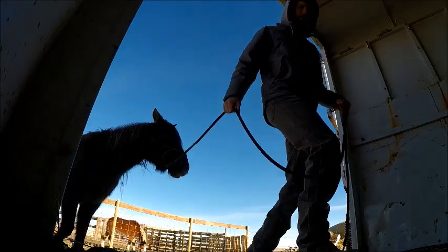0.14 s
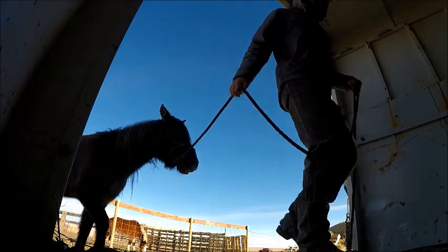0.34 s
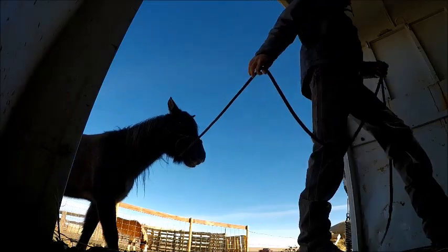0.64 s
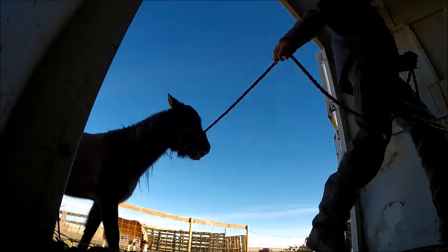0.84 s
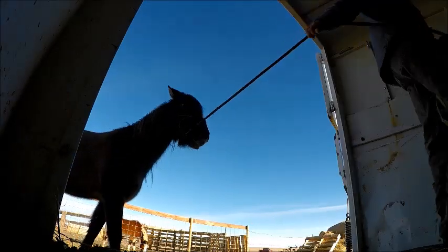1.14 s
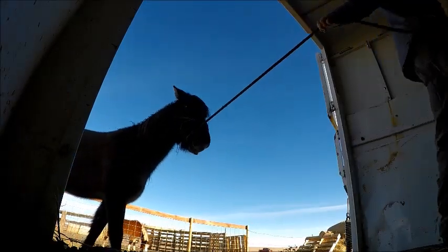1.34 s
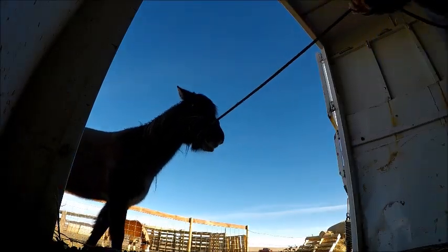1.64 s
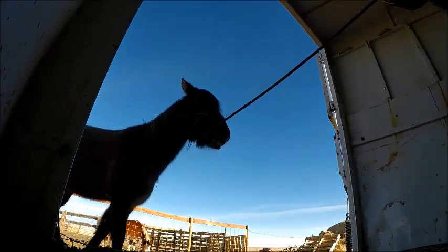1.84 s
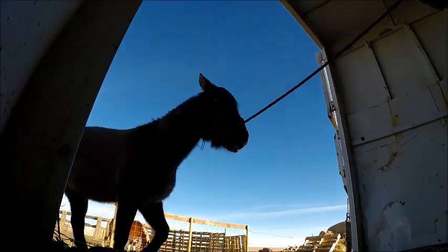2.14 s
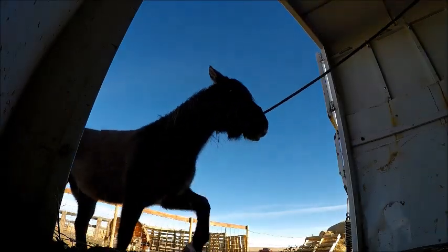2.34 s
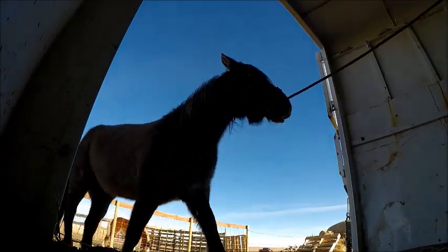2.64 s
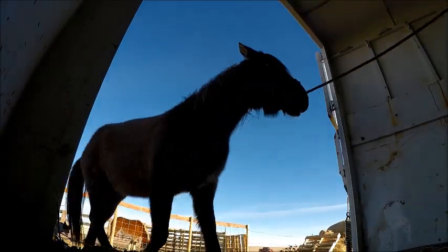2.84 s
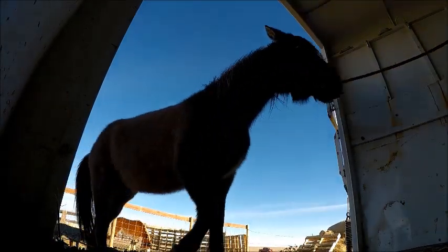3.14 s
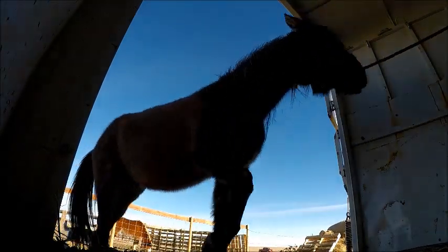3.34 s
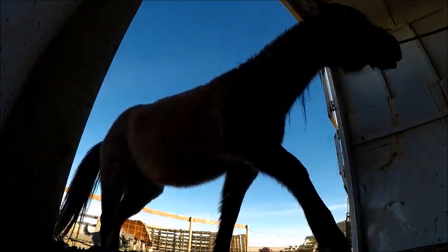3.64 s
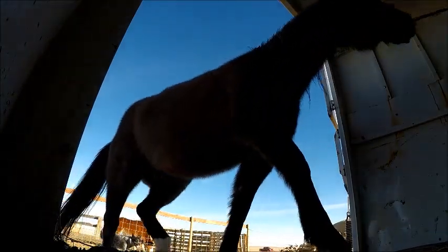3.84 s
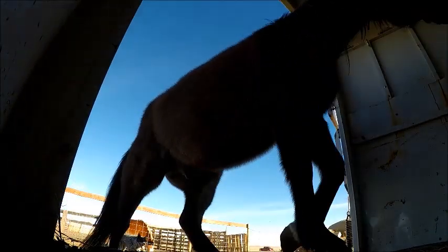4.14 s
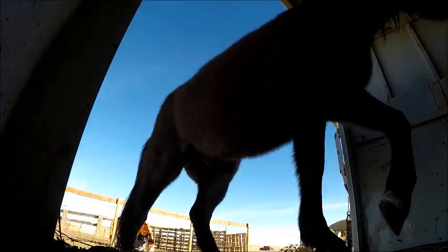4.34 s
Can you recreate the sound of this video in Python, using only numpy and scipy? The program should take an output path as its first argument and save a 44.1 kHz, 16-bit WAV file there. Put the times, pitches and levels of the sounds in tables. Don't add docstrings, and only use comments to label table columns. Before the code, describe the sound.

Heard from the floor of a steel stock trailer: a quick boot thump with knocks and a metallic tick, small rattles and softer steps. Thin hinge squeaks chirp. Then a hoof lands with a loud, deep hollow boom, the gate squeaks long and high, and two more heavy hoof blows follow, panels ringing briefly. Low rocking rumble and faint outdoor hiss remain.

```python
import sys
import numpy as np
from scipy import signal
from scipy.fft import rfft, irfft, next_fast_len
from scipy.io import wavfile
from scipy.ndimage import uniform_filter1d

SR = 44100
rng = np.random.default_rng(int(sys.argv[2]) if len(sys.argv) > 2 else 0)


def level_to_linear(level):
    exponent = np.asarray(level, float) / 20
    return 10 ** exponent


def output_pcm(signal):
    pcm = np.clip(np.atleast_2d(signal).T, -1, 1) * 32767
    wavfile.write(sys.argv[1], SR, np.round(pcm).astype(np.int16))


N = 198047


def rms_one(x):
    return x / np.sqrt(np.mean(x ** 2) + 1e-20)


def in_time(rows):
    time_s, *columns = np.transpose(rows)
    return [np.interp(np.arange(N) / SR, time_s, column) for column in columns]


def at_hz(points, hz):
    points_hz, values = np.transpose(points)
    return np.interp(np.log(hz), np.log(points_hz + 1), values)


def drift(rate_hz):
    r = np.exp(-80 * np.pi * rate_hz / SR)
    white = rng.standard_normal(N // 40 + 2002)
    slow = signal.lfilter([1], [1, -2 * r, r * r], white)[2000:]
    return np.interp(np.arange(N) / 40, np.arange(len(slow)), rms_one(slow))


def ring(x, hz, t60_s):
    r, w = level_to_linear(-60 / (t60_s * SR)), 2 * np.pi * hz / SR
    return signal.lfilter([0, np.sin(w)], [1, -2 * r * np.cos(w), r * r], x + 1e-18)


def swell(clicks, rise_s, t60_s):
    up, down = np.exp(-1 / (rise_s * SR)), level_to_linear(-60 / (t60_s * SR))
    dying = signal.lfilter([1], [1, -down], clicks + 1e-18)
    return signal.lfilter([1 - up], [1, -up], dying)


def band(x, low_hz, high_hz):
    sos = signal.butter(2, [low_hz, high_hz], "band", fs=SR, output="sos")
    return rms_one(signal.sosfilt(sos, x))


def low_pass(x, cut_hz):
    return signal.sosfilt(signal.butter(4, cut_hz, fs=SR, output="sos"), x)


def strikes(rows, colour_db, colour_hz, hz):
    clicks = np.zeros(N)
    grip_db = [np.interp(np.log(hz), np.log(colour_hz), c) for c in colour_db]
    scatter_db = rng.standard_normal(len(rows))
    clicks[(rows[:, 0] * SR).astype(int)] = level_to_linear(rows[:, 1] + grip_db + scatter_db)
    return clicks


def struck(felt, modes, build_cycles):
    out = 0
    for k, (hz, mode_db, t60_s) in enumerate(modes):
        wave = ring(felt(hz), hz, t60_s) * rng.choice([-1, 1])
        r, turn = np.exp(-hz / (build_cycles * SR)), np.exp(2j * np.pi * hz / SR)
        built = signal.lfilter([2 - 2 * r], [1, -r * turn], wave).real
        out = out + level_to_linear(mode_db) * built * np.array([[1], [0.3 * (-1) ** k]])
    return out


# (frequency [Hz], t60 [s])
DENSE_T60 = [(40, 0.41), (110, 0.85), (280, 0.5), (740, 0.38), (1940, 0.51), (5120, 1)]


def crowded(felt, edges_hz, build_cycles, top_slope_db, front_db):
    out, white = 0, rng.standard_normal((2, 2, N)) * [[1], [.5]]
    for k, (low, high) in enumerate(zip(edges_hz, edges_hz[1:])):
        hz = np.sqrt(low * high)
        clicks = felt(hz) * level_to_linear(top_slope_db * max(np.log2(hz / 2100), 0))
        body = swell(clicks, build_cycles / hz, at_hz(DENSE_T60, hz))
        front = level_to_linear(front_db) * swell(clicks, 0.0014, 0.01)
        out = out + (body + front) * band(white[k % 2], low, high)
    return out


# (time [s], peak [dB], spring boom, frame thud, plank thud [dB re peak])
THUMPS = [(0.06, -26, -4.5, -2, -11), (0.117, -25, -20, -35, -8), (0.555, -28.5, -59, -13.5, -3),
          (0.838, -21, -5, -14.5, -12), (0.969, -30.5, -33, -4, -10), (1.564, -24.5, -0.5, -8, -10),
          (1.582, -25.5, -28, -5, -10.5), (1.749, -30.5, -34, -8.5, -12.5), (2.25, -28.5, -27, -13, -12),
          (2.58, -46, -15, -7, 3), (2.632, -30, -25, -6, -2), (2.646, -5.5, -9, -10.5, -8),
          (2.689, -9, -12, -12, -23), (3.119, -20, -6.5, -9, -16.5), (3.752, -3.5, -7, -10, -26.5),
          (3.779, -15, -10, -40, -8), (3.999, -18, -5.5, -21.5, -29), (4.152, -9, -27, -0.5, -10.5),
          (4.197, -22.5, 7.5, -22, -33), (4.368, -23.5, 4.5, -13, -48)]
# boom, frame and plank centres [Hz]
THUMP_HZ = [50, 115, 210]
# (frequency [Hz], level [dB], t60 [s])
FRAME = [(48.44, 5, 0.66), (103.8, -2.5, 0.5), (130.6, 4, 0.23), (150.8, 0, 0.25), (177.9, -2, 0.66),
         (208.6, -4, 0.35), (253.5, -5.5, 0.52), (273, -9.5, 0.14)]


def thumps(boom_db=-4, clear_db=-4, dense_db=-14):
    rows = np.array(THUMPS)
    felt = lambda hz: strikes(rows, rows[:, 2:], THUMP_HZ, hz)
    edges_hz = 80 * 2 ** np.arange(0, 2.1, 1 / 2)
    planks = crowded(felt, edges_hz, build_cycles=0.09, top_slope_db=0, front_db=-48)
    boom = struck(felt, FRAME[:1], build_cycles=0.44)
    frame = struck(felt, FRAME[1:], build_cycles=0.3)
    return level_to_linear(boom_db) * boom + level_to_linear(clear_db) * frame + level_to_linear(dense_db) * planks


# (time [s], peak [dB], knock, clack, crack [dB re peak])
KNOCKS = [(0.055, -26.5, -7, -12, -28), (0.093, -34, -18, -18, -12), (0.103, -24.5, -12, -1, -43),
          (0.11, -31, 4, -6, -3.5), (0.846, -51, -8, 5, -6), (0.968, -46.5, 1, -9, -3),
          (1.562, -39.5, -2, -10, -46), (1.614, -37.5, -4, -41, -17), (2.579, -48, -9, 4, -8),
          (2.644, -14.5, -2, 0, -30), (2.656, -37, 17.5, -30, 2), (3.113, -40, -10, -4, -30),
          (3.68, -38.5, -7, -29, -29), (3.753, -14.5, -14, -5.5, -53), (4.15, -27.5, 1.5, -11, -12),
          (4.157, -25.5, -6.5, 2, -42), (4.175, -34, 5, -18, -27)]
# reference, knock, clack and crack centres [Hz]
KNOCK_HZ = [400, 650, 1100, 2100]
# (frequency [Hz], level [dB], t60 [s])
PANELS = [(313, 2.5, 0.06), (362, 1, 0.012), (460, 1.5, 0.24), (490, -5, 0.44), (537, -3, 0.15),
          (600, -6, 0.23), (717, -4, 0.075), (849, -1, 0.33), (1050, -17, 0.12), (1280, -2, 0.063),
          (1564, 0, 0.099), (1750, -13, 0.067), (1970, 2, 0.2)]
CHOKE_DB_PER_S, PLANTED_FROM_S, PLANTED_CHOKE_DB_PER_S = 36.5, 4.1, 76
MAT_CUT_HZ = 4150


def knocks(clear_db=-7, dense_db=-15):
    rows, t = np.array(KNOCKS), np.arange(N) / SR
    colour_db = np.pad(rows[:, 2:5], ((0, 0), (1, 0)))
    felt = lambda hz: strikes(rows, colour_db, KNOCK_HZ, hz)
    edges_hz = 290 * 2 ** np.arange(0, 4.1, 1 / 3)
    dense = crowded(felt, edges_hz, build_cycles=0.89, top_slope_db=-11, front_db=10.5)
    dense = low_pass(dense, MAT_CUT_HZ)
    last_s = rows[np.maximum(np.searchsorted(rows[:, 0], t) - 1, 0), 0]
    choke_db_per_s = np.where(last_s < PLANTED_FROM_S, CHOKE_DB_PER_S, PLANTED_CHOKE_DB_PER_S)
    choke = level_to_linear(-choke_db_per_s * (t - last_s))
    clear = struck(felt, PANELS, build_cycles=0.47)
    return choke * (level_to_linear(clear_db) * clear + level_to_linear(dense_db) * dense)


# (time [s], peak [dB], ring [Hz])
TICKS = [(0.0653, -43, 6100), (0.0657, -36, 7600), (0.0653, -60, 11500), (0.0917, -20, 1030),
         (0.0917, -37, 6400), (0.0922, -28, 1940), (0.1027, -25.5, 1800), (0.1094, -27.5, 2060),
         (0.0545, -29, 390), (0.069, -46, 2100), (0.0965, -37, 2120), (0.1265, -41, 2030),
         (0.137, -42, 1950), (0.5122, -42, 5700), (0.5135, -39, 3550), (0.526, -46, 5800),
         (0.5265, -46, 2150), (0.5275, -36, 3700), (0.9682, -46, 930), (1.003, -51, 4270),
         (0.954, -47, 2900), (1.608, -48, 1880), (0.98, -39, 1050), (2.0043, -63, 2330),
         (2.0043, -43, 6140), (2.0043, -43, 6940), (2.0032, -50, 9200), (2.0043, -51, 11400),
         (2.4633, -52, 1590), (2.6495, -24.5, 1690), (2.6535, -35, 1990), (2.664, -38, 2100),
         (2.689, -37, 1720), (2.696, -36, 2110), (2.6545, -40, 3260), (2.7145, -37.5, 3200),
         (3.5249, -50, 1920), (3.7853, -28.5, 3300), (3.9474, -47, 3500), (4.1645, -40, 2100),
         (4.167, -43, 3220), (4.177, -51, 2700), (4.175, -27, 600), (4.151, -59, 3560), (3.653, -44, 400),
         (3.667, -48, 704), (3.759, -27, 494), (3.7625, -38, 3100), (3.772, -41, 3140), (3.803, -44, 510),
         (3.842, -55, 470)]
# (time [s], peak [dB], centre [Hz])
CRACKS = [(0.0546, -30.5, 427), (0.07, -25.5, 68.3), (0.112, -28, 64.4), (3.784, -48, 1490),
          (3.796, -43, 1490), (3.774, -16, 256), (1.0036, -52, 3900), (3.5249, -52, 5500),
          (3.7565, -39, 3600), (3.757, -44, 6300), (3.7985, -44, 3400), (3.808, -38, 1300),
          (3.816, -39, 1700), (3.829, -48, 4900), (3.838, -49, 2200), (3.851, -49, 2100),
          (3.883, -42, 5200), (3.889, -46, 3170), (3.899, -44, 2300), (3.907, -48, 2500),
          (0.1028, -32, 3500), (0.111, -46, 3000), (0.1143, -19.5, 344), (0.1222, -28.5, 210),
          (2.0044, -57, 2500), (2.0044, -49, 6500), (2.4633, -43, 1600), (2.645, -16, 1500),
          (2.645, -39, 3470), (2.6464, -14, 423), (2.6551, -24, 258), (3.5249, -40, 1510),
          (3.5249, -49, 800), (3.751, -33, 1110), (3.7853, -42, 4300), (3.8276, -46, 2400),
          (3.88, -48, 2500), (4.151, -21, 1380), (4.1512, -29.5, 1900), (4.1515, -39, 600),
          (4.1565, -19, 246), (4.191, -34, 820)]
# (time [s], peak [dB], ring [Hz])
RINGS = [(0.112, -30.5, 297.6), (0.155, -41.5, 183), (0.162, -34, 289), (0.56, -53, 431), (0.478, -40, 256),
         (0.48, -45, 500), (0.51, -43, 395), (0.512, -45, 760), (2.644, -25.5, 600), (2.64, -20.5, 223),
         (2.675, -26, 600), (2.676, -34, 550), (2.69, -26.5, 383), (2.692, -26, 247), (2.694, -28, 189.5),
         (0.0555, -38, 557), (0.055, -49, 1280), (2.74, -36, 582), (3.53, -46, 447), (3.758, -20, 445),
         (3.751, -34, 1110), (3.751, -31, 925), (3.783, -30, 850), (3.798, -38, 1030), (3.788, -38, 600),
         (3.82, -35.5, 396), (3.862, -42.5, 460), (3.94, -52, 563), (3.97, -48.5, 714), (4.152, -25.5, 634),
         (4.153, -22, 228.6), (4.165, -26, 490), (4.188, -30, 308), (4.225, -53, 1350), (4.171, -33, 690),
         (4.215, -27, 175.4)]
# (time [s], peak [dB], ring [Hz])
LONG_RINGS = [(0.104, -35, 438), (0.105, -31, 1010), (0.106, -52, 1950), (0.128, -44, 1810),
              (0.14, -45, 1180), (0.15, -46, 774), (0.511, -50, 6300), (0.511, -50, 5700),
              (0.512, -52, 4540), (0.512, -44, 2610), (0.513, -45, 3560), (0.517, -56, 5110),
              (0.523, -43, 4040), (0.523, -41, 3710), (0.523, -48, 2180), (0.524, -48, 1665),
              (0.544, -50, 2050), (1.003, -49, 2910), (1.7, -58, 1510), (1.67, -58, 2970), (2.69, -34, 600),
              (0.565, -59, 1920), (0.573, -57, 2180), (2.646, -34, 600), (2.647, -36, 308),
              (2.65, -42, 718), (2.648, -38, 1750), (2.66, -42, 950), (2.685, -44, 1780), (2.71, -37, 910),
              (3.753, -45, 470), (3.76, -47, 1895), (3.764, -47, 3280), (3.826, -51, 4700),
              (3.828, -53, 2440), (3.83, -54, 6400), (3.878, -51, 2450), (4.153, -36, 1177),
              (4.156, -42, 724), (4.186, -46, 875), (4.2, -42, 960), (4.215, -57, 1505)]
TICK_CYCLES, CRACK_CYCLES, RING_CYCLES, LONG_RING_CYCLES = 15.2, 6.4, 26.2, 78


def ticks(level_db=3):
    out, span = np.zeros((2, N)), SR // 4
    click = np.arange(span) == 0
    kinds = [(TICKS, TICK_CYCLES), (CRACKS, CRACK_CYCLES),
             (RINGS, RING_CYCLES), (LONG_RINGS, LONG_RING_CYCLES)]
    for rows, cycles in kinds:
        for time_s, peak_db, hz in rows:
            start = int(time_s * SR)
            t60_s = cycles / hz
            wave = ring(ring(click, hz, t60_s), hz, t60_s / 2)
            out[0, start:start + span] += level_to_linear(peak_db + level_db) * wave / np.abs(wave).max()
    return out


# (time [s], peak [dB], centre [Hz], t60 [s])
RATTLES = [(0.031, -50.5, 5300, 1), (0.084, -43, 5000, 0.063), (0.101, -41.5, 6500, 0.17),
           (0.508, -40.5, 5340, 0.13), (1.001, -42, 5040, 0.07), (2.017, -50, 6600, 0.36),
           (2.029, -59, 6600, 0.06), (2.664, -53, 6600, 0.18), (2.69, -52, 4400, 0.096),
           (2.732, -48.5, 4600, 0.082), (2.7554, -48, 5080, 0.044), (2.837, -47.5, 4730, 0.098),
           (2.9284, -55, 4600, 0.096), (3.0774, -64, 5300, 0.065), (3.328, -54.5, 6350, 0.69),
           (3.524, -47, 6540, 0.28), (3.75, -41.5, 6200, 0.13), (3.772, -43, 6060, 0.1),
           (3.827, -39.5, 5430, 0.067), (3.847, -47.5, 5600, 0.32), (3.877, -42, 5370, 0.068),
           (3.893, -60, 6150, 0.12), (3.948, -56.5, 4560, 0.22), (4.0344, -60, 4650, 0.088),
           (4.134, -57.5, 5380, 0.18), (4.154, -57, 6200, 0.31), (4.236, -54.5, 5140, 0.18),
           (4.4365, -56.5, 6600, 0.29), (4.4801, -55, 6100, 0.058)]
# (time [s], peak [dB], centre [Hz])
SCUFFS = [(0.514, -41.5, 2720), (0.52, -45, 4030), (0.5286, -46, 2150), (0.965, -39, 1390),
          (1.0183, -54, 1600), (1.255, -46.5, 6800), (1.608, -50, 1500), (1.6894, -44, 1470),
          (1.72, -52, 1570), (2.4617, -38, 1590), (2.6644, -40, 2490), (2.7544, -54, 2760),
          (2.8384, -51.5, 2860), (2.9656, -51, 2800), (3.5245, -54, 1490), (3.7524, -45, 3100),
          (3.764, -44.5, 3220), (3.79, -54, 3170), (3.795, -49, 1400), (3.831, -49, 2780),
          (3.883, -48, 2510), (4.0334, -57, 2730), (4.151, -49, 2880), (4.175, -52, 2700),
          (4.2365, -54, 2300)]
RATTLE_BROAD_DB = 2.5
SCUFF_T60_S, SCUFF_BROAD_DB = 0.23, -6
RATTLE_CUT_HZ = 9160


def rattles(level_db=-8, grains_per_s=6000, grain_db=-1.5):
    sizes = level_to_linear(grain_db * np.minimum(rng.exponential(1, (2, N)), 3)) * rng.choice([-1, 1], (2, N))
    grains = (rng.random((2, N)) < grains_per_s / SR) * sizes
    broad, out, span = band(grains, 1200, 6500), np.zeros((2, N)), SR // 4
    click = np.arange(span) == 0
    bursts = [(*row, RATTLE_BROAD_DB) for row in RATTLES]
    bursts += [(*row, SCUFF_T60_S, SCUFF_BROAD_DB) for row in SCUFFS]
    for time_s, peak_db, hz, t60_s, broad_db in bursts:
        start = int(time_s * SR)
        part = slice(start, min(start + span, N))
        burst = band(grains[:, part], hz * 0.69, hz * 1.275) + level_to_linear(broad_db) * broad[:, part]
        shape = swell(click, 0.00098, t60_s)[:burst.shape[1]]
        out[:, part] += level_to_linear(peak_db + level_db) * shape * burst
    return low_pass(out, RATTLE_CUT_HZ)


SQUEAK_DIP_SHARE, SQUEAK_EDGE_DB = 0.55, 0.5


def short_squeak(start_s, length_s, start_hz, end_hz, peak_db, octave_db):
    share = np.array([0, SQUEAK_DIP_SHARE, 1])
    level_db = peak_db + SQUEAK_EDGE_DB * np.array([1, 0, 1])
    pitch_hz = start_hz + (end_hz - start_hz) * share
    return np.transpose([start_s + length_s * share, pitch_hz, level_db, level_db + octave_db])


# (time [s], length [s], start [Hz], end [Hz], level [dB])
LATCH_SQUEAKS = [
    (0.998, 0.034, 4680, 4670, -59.5),
    (1.529, 0.11, 4290, 4220, -67.5),
    (2.076, 0.032, 4500, 4090, -62.5),
    (2.4, 0.071, 7770, 7560, -70),
    (2.595, 0.055, 6300, 6300, -77),
]
# (time [s], length [s], start [Hz], end [Hz], level [dB])
GATE_SQUEAKS = [
    (2.37, 0.065, 3980, 3920, -75),
    (2.471, 0.048, 3590, 3486, -60),
    (2.515, 0.045, 3520, 3350, -65),
]
LATCH_OCTAVE_DB, GATE_OCTAVE_DB = -17, -3.5
# (time [s], pitch [Hz], level [dB], octave [dB])
LONG_SQUEAK = [(2.688, 3810, -62, -90), (2.736, 3760, -66, -68), (2.766, 3733, -57.5, -81),
               (2.828, 3720, -59.5, -77), (2.87, 3720, -64, -79), (2.92, 3741, -67, -65),
               (2.952, 3730, -60, -70), (3.002, 3760, -70, -68), (3.02, 3750, -59.5, -81),
               (3.08, 3740, -57.5, -70), (3.108, 3650, -64.5, -74), (3.14, 3560, -63, -88),
               (3.158, 3560, -72, -88), (3.185, 3600, -80, -90)]
# (time [s], pitch [Hz], level [dB], octave [dB])
LATCH_SLIDE = [(2.002, 4750, -59, -83), (2.021, 4790, -66, -90), (2.031, 4760, -69, -88),
               (2.04, 4730, -73, -88), (2.049, 4630, -59, -80), (2.06, 4490, -61, -80),
               (2.073, 4150, -62, -82), (2.085, 3870, -62, -82), (2.097, 3700, -68, -88)]
BREAKUP_HZ_PER_S = 2600


def squeaks(wobble=0.0011, scatter=0.022, flutter_db=6, waver_db=0.5, echo_db=-1):
    out, broken, t = 0, 0, np.arange(N) / SR
    slow, fast, flutter = drift(27), drift(143), drift(98)
    glides = [short_squeak(*row, LATCH_OCTAVE_DB) for row in LATCH_SQUEAKS]
    glides += [short_squeak(*row, GATE_OCTAVE_DB) for row in GATE_SQUEAKS]
    for rows in glides + [LONG_SQUEAK, LATCH_SLIDE]:
        hz, tone_db, octave_db = in_time(rows)
        fall_hz_per_s = uniform_filter1d(-np.gradient(hz) * SR, size=SR // 50)
        rough = np.clip(np.maximum.accumulate(fall_hz_per_s) / BREAKUP_HZ_PER_S, 0, 1) ** 2 * 0.65
        on = np.clip(np.minimum(t - rows[0][0], rows[-1][0] - t) / 0.01, 0, 1)
        phase = 2 * np.pi * np.cumsum(hz * (1 + wobble * slow + scatter * rough * fast)) / SR
        tone = level_to_linear(tone_db) * np.sin(phase) + level_to_linear(octave_db) * np.sin(2 * phase)
        tone = on * level_to_linear(8.5 - 3.8 * rough + flutter_db * rough * flutter + waver_db * slow) * tone
        out = out + tone
        broken = broken + level_to_linear(echo_db) * rough * tone
    near, far = np.roll(broken, int(0.0079 * SR)), np.roll(broken, int(0.02 * SR))
    return np.array([out + near + 0.6 * far, 0.19 * out + far])


def shaken(resonances):
    white = rng.standard_normal((2, N + SR // 4))
    out = 0
    for k, (hz, width_hz, db) in enumerate(resonances):
        t60_s = np.log(1000) / (np.pi * width_hz)
        out = out + (-1) ** k * level_to_linear(db) * rms_one(ring(white, hz, t60_s))
    return rms_one(out[:, SR // 4:])


# (time [s], level [dB])
ROCKING = [(0.0, -53), (0.3, -44.5), (0.6, -53.5), (1.05, -43), (1.27, -48), (1.6, -36.5), (2.1, -44),
           (2.62, -50), (2.76, -23), (3.05, -31.5), (3.45, -37.5), (3.61, -34), (3.86, -46), (4.0, -41.5),
           (4.19, -20.5), (4.3, -29.5), (4.49, -28.5)]
# (time [s], level [dB])
LOAD = [(0.0, -68), (0.17, -43), (0.3, -60), (1.05, -64), (1.3, -44.5), (2.5, -75), (2.63, -60),
        (2.78, -34.5), (3.05, -26), (3.2, -31), (3.61, -30), (3.86, -39), (4.0, -30), (4.19, -30),
        (4.3, -41), (4.49, -27)]
# (time [s], level [dB])
MURMUR_LEVEL = [(0.0, -43), (0.25, -39), (0.42, -45.5), (0.58, -45), (0.75, -45), (0.95, -42), (1.3, -45.5),
                (1.65, -44), (2.0, -46.5), (2.3, -42), (2.55, -44.5), (2.8, -36), (3.1, -44.5), (3.5, -43),
                (3.85, -41.5), (4.05, -45.5), (4.3, -53), (4.49, -49.5)]
# (frequency [Hz], width [Hz], level [dB])
SWAY = [(29.3, 5.6, -3), (39, 20.6, -3), (49.86, 6.6, 1), (59.6, 32, -3.5)]
# (frequency [Hz], width [Hz], level [dB])
MURMUR = [(106.3, 41, -1), (131.2, 24, 1.5), (184.5, 19, 0), (242.4, 45, -4.5), (312.6, 65, -5.5),
          (431, 61, -7.5), (485, 170, -12.5)]
HUM_HZ = 76.7


def rocking():
    (sway_db,), (hum_db,), (murmur_db,) = in_time(ROCKING), in_time(LOAD), in_time(MURMUR_LEVEL)
    phase = 2 * np.pi * np.cumsum(HUM_HZ * (1 + 0.015 * drift(4.27))) / SR
    hum = np.sin(phase) * level_to_linear(1 + 1.5 * drift(6.0)) * [[1], [.3]]
    sway = level_to_linear(sway_db) * shaken(SWAY)
    murmur = level_to_linear(murmur_db + 2.07 * drift(19.3)) * shaken(MURMUR)
    return sway + level_to_linear(hum_db) * hum + murmur


# (time [s], level [dB])
OUTDOORS = [(0.0, -57), (0.4, -51), (0.6, -56), (1.04, -54.5), (1.26, -58.5), (1.49, -56.5), (1.65, -52.5),
            (1.98, -58), (2.1, -60), (2.38, -55.5), (2.66, -53.5), (3.03, -59.5), (3.14, -56.5), (3.8, -57),
            (4.18, -64.5), (4.49, -63)]
# (frequency [Hz], density [dB per Hz])
HISS = [(290, -29), (500, -4.5), (583, -4.5), (670, -6.5), (770, -6.5), (1050, -2.5), (1120, -8),
        (1290, -11.5), (1420, -13.5), (2450, -15), (3720, -20), (7070, -16.5), (14000, -35.5)]


def outdoors(patchy_db=2.0):
    out, white = 0, rng.standard_normal((2, 2, N))
    edges_hz = 450 * 2 ** np.arange(0, 5.2, 1 / 3)
    together = drift(8.2)
    for k, (low, high) in enumerate(zip(edges_hz, edges_hz[1:])):
        density_db = at_hz(HISS, np.sqrt(low * high))
        gain = level_to_linear(density_db + patchy_db * (0.4 * together + drift(14.0))) * np.sqrt(high - low)
        out = out + gain * band(white[k % 2], low, high)
    return level_to_linear(in_time(OUTDOORS)[0] + 3.0) * rms_one(out)


# (frequency [Hz], phase [rad])
PORT_PHASE = [(0, 0.1), (480, 0.25), (630, 0.6), (800, 2.7), (1050, 2.6), (1600, 1.4), (2050, 0.4),
              (12000, 0.3)]
# (frequency [Hz], level [dB])
PORT_BALANCE = [(60, -8), (150, -3.5), (370, -5), (900, -0.5), (2220, -0.5), (5490, -2), (13500, 0)]
# (frequency [Hz], share [0-1])
LIKENESS = [(50, 0.97), (250, 0.94), (600, 0.19), (1100, 0.99), (2000, 0.15), (4000, 0.18), (9000, 0.076)]


def ports(pair):
    size = next_fast_len(N + 4096)
    hz = np.fft.rfftfreq(size, 1 / SR) + 1
    common, other = rfft(pair, size)
    alike = at_hz(LIKENESS, hz)
    offset = level_to_linear(at_hz(PORT_BALANCE, hz) / 2) * np.exp(.5j * at_hz(PORT_PHASE, hz))
    common, other = common * np.sqrt((1 + alike) / 2), other * np.sqrt((1 - alike) / 2)
    return irfft([(common + other) * offset, (common - other) / offset], size)[:, :N]


def scene():
    return ports(thumps() + knocks() + ticks() + rattles() + rocking() + outdoors() + squeaks())


def band_limit(x):
    return signal.sosfilt(signal.butter(12, 14140, fs=SR, output="sos"), x)


def record(dry):
    cut = signal.sosfilt(signal.butter(2, 24, "high", fs=SR, output="sos"), dry)
    mix = 0.53 * np.tanh(cut / 0.73)
    return band_limit(mix)


dry = scene()
out = record(dry)
output_pcm(out)
```